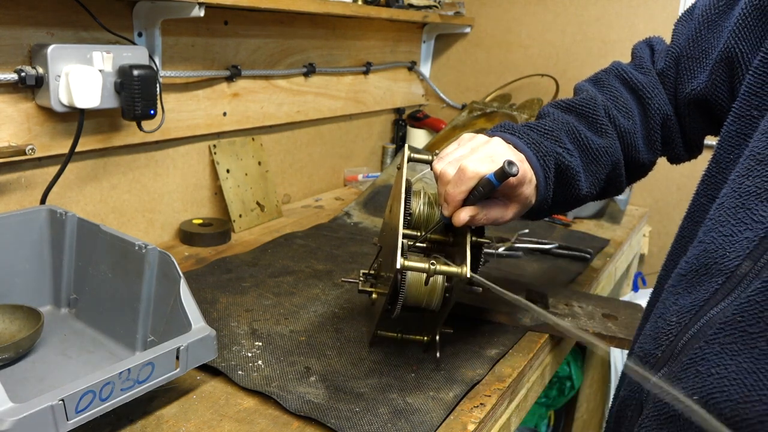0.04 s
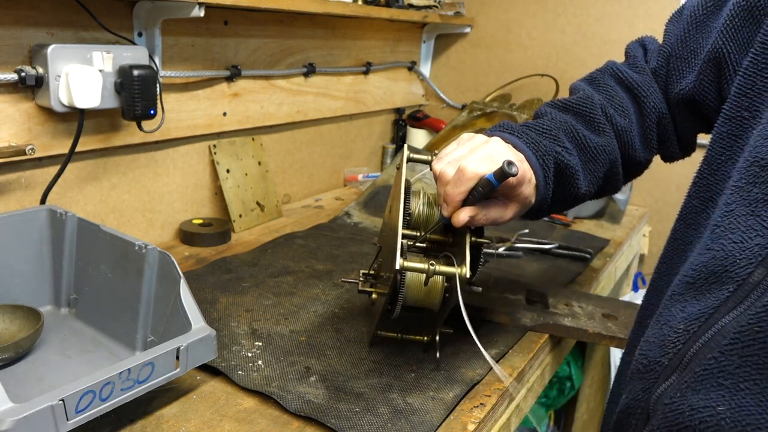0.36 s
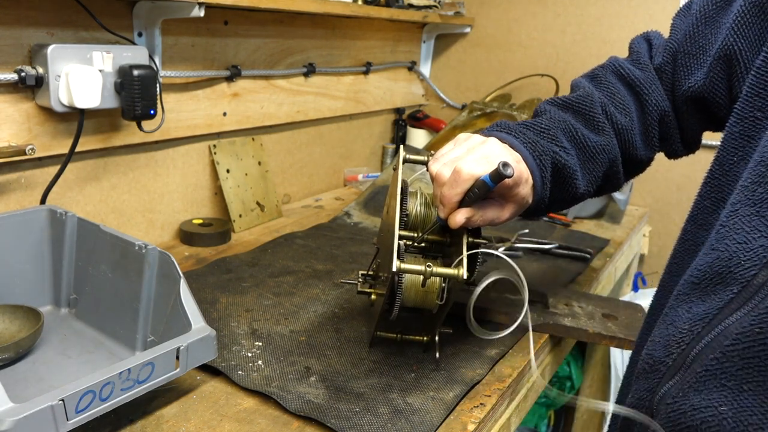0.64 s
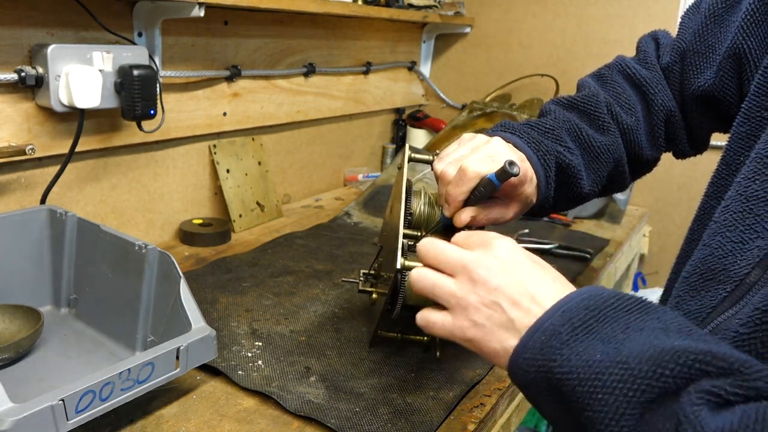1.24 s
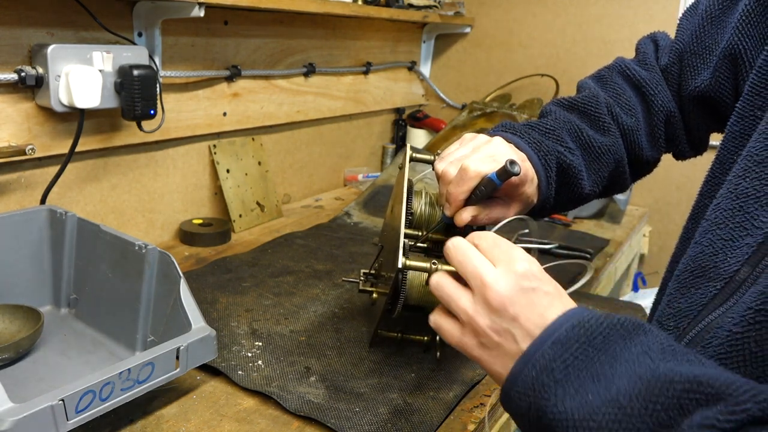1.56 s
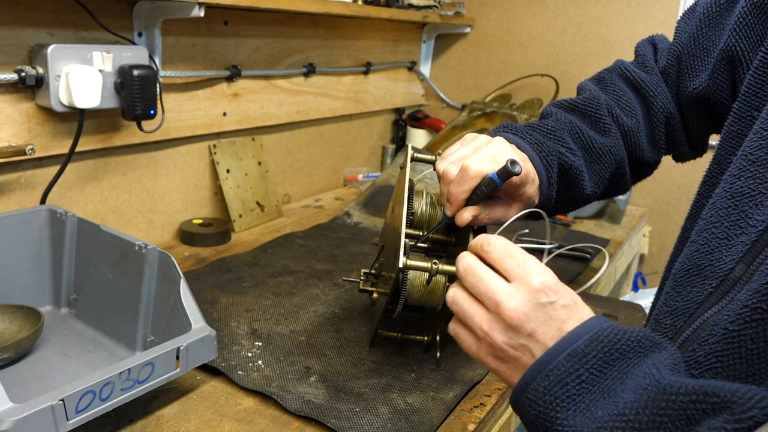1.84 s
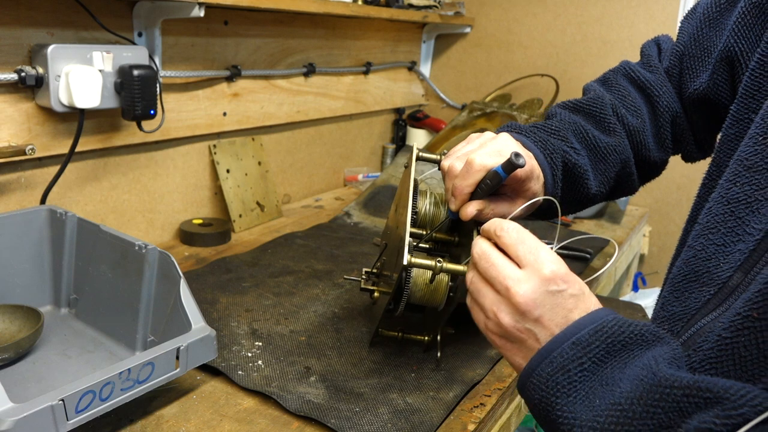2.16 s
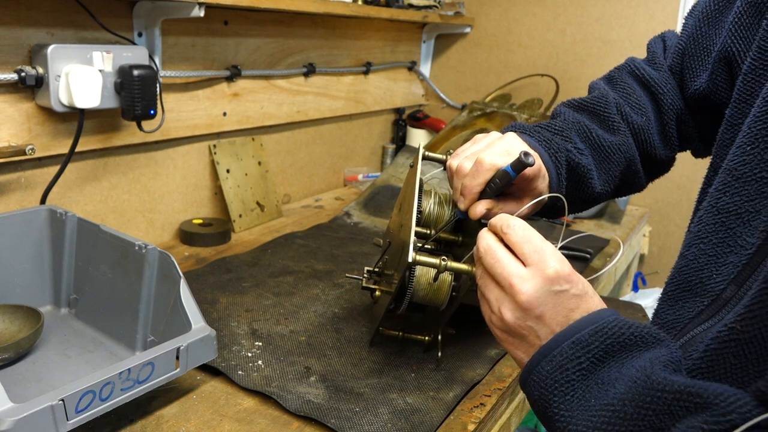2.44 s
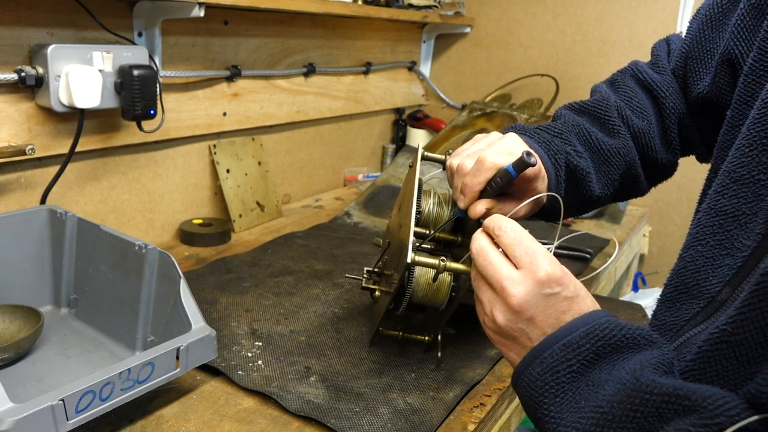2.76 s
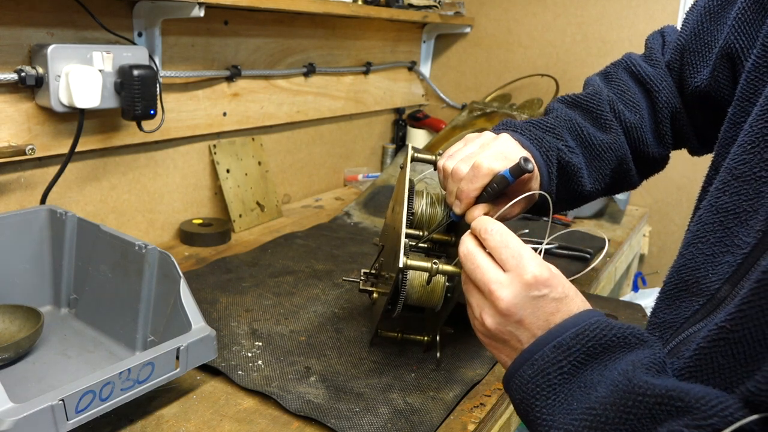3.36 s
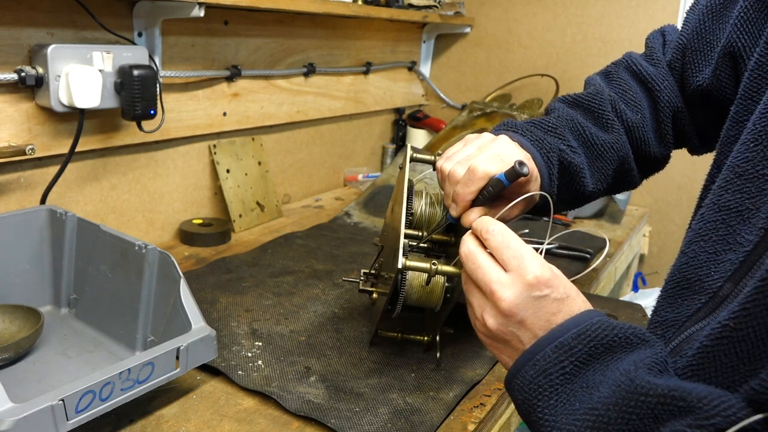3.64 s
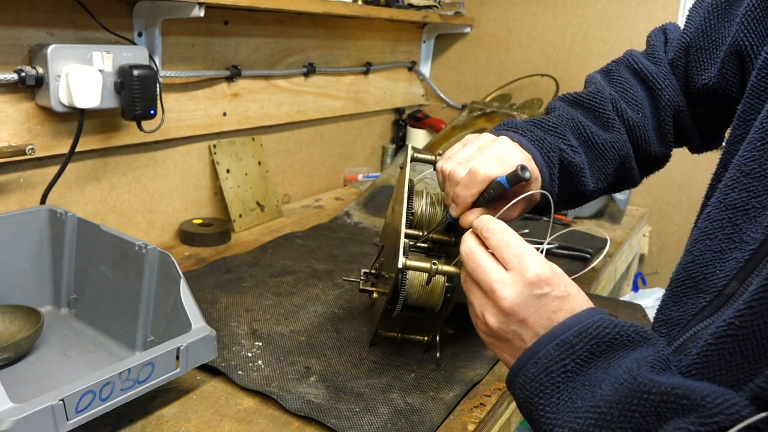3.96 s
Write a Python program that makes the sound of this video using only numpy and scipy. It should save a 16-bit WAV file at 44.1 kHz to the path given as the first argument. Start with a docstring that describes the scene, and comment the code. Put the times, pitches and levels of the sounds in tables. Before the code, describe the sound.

Fast rattling rasp of line pulled from brass clockwork, then sparse clicks and light knocks.

```python
"""First comes a fast rasp and rattle: a line is pulled out of a brass clock movement (the works of a
clock) on a workshop bench, snagging as it runs through the frame and spins the barrel, its drum.
Then hands work at the movement: steel knocks on brass and makes it ring, the frame bumps the bench,
and the line clicks and rubs. Other clocks tick faintly across the small room, over a low rumble."""
import sys
import numpy as np
from scipy import signal
from scipy.fft import rfft, irfft, next_fast_len
from scipy.io import wavfile

SR = 44100
rng = np.random.default_rng(int(sys.argv[2]) if len(sys.argv) > 2 else 0)


def master(y):
    """Save y as 16-bit WAV."""
    cut = np.clip(np.atleast_2d(y).T, -1, 1)
    pcm = np.round(cut * 32767)  # scale
    wavfile.write(sys.argv[1], SR, pcm.astype(np.int16))


N = 176400
T = np.arange(N) / SR
HIT_T = T[:SR // 3]  # time within one hit
TOP_HZ = 11050

# how hard the line is pulled: (time [s], level [dB])
PULL_STRENGTH = [(0, -14.5), (.028, -29), (.092, -25), (.108, -15), (.15, -30), (.245, -14.5), (.48, -17),
                 (.538, -20), (.572, -39), (.625, -32), (.72, -79)]
# the faster the line runs, the brighter it is: (time [s], treble [dB])
PULL_TREBLE = [(0, -2), (.2, -2.5), (.55, 4)]
# tone colour of the running line: (frequency [Hz], level [dB])
LINE_COLOUR = [(150, -21), (780, -17.5), (2400, 0.5), (3700, -3.5), (4400, -6), (5800, 4.5), (7150, 0.5),
               (7800, -2.5), (10900, 0)]
# the frame's modes, the tones it rings at: (frequency [Hz], level [dB], time to fade by 60 dB [s])
FRAME_MODES = [(1262, -1, .009), (2470, 2.5, .012), (3150, 1.5, 0.017), (3550, 1.5, 0.015),
               (4050, 4, 0.047)]
# the line snags: (time [s], level [dB])
SNAGS = [(.035, -16.5), (0.0441, -15.5), (.102, -15), (.127, -16), (0.152, -17), (.180, -15.5),
         (.188, -13.5), (.204, -14), (.234, -14), (.295, -15.5), (3.8474, -15)]
# tone of a snag: (frequency [Hz], level [dB])
SNAG_COLOUR = [(300, -16), (2000, -8.5), (3300, 3.5), (4500, -3), (9000, -10)]
# steel knocks on brass: (time [s], level [dB], treble [dB], ring level [dB], ring fade time [s])
KNOCKS = [(1.5335, -12.5, -0.5, -0.5, 0.14), (1.8, -15.5, 6, 3, 0.15), (2.135, -20, -8, -3.5, .11),
          (2.2761, -25, -21, -2.5, 0.084)]
# tone of a knock: (frequency [Hz], level [dB])
KNOCK_COLOUR = [(150, -8.5), (700, -5.5), (1300, 2.5), (3300, 1.5), (5000, -3.5), (6400, -2), (8000, -15)]
# the frame bumps the bench: (time [s], level [dB], treble [dB], low modes [dB])
BUMPS = [(1.5836, -27.5, -10, 3), (2.3106, -19, 7, 1), (2.8654, -25, -26, -16)]
# tone of a bump: (frequency [Hz], level [dB])
BUMP_COLOUR = [(200, -6.5), (1200, 6.5), (2000, -3.5), (5000, -5.5), (6400, 1), (7600, -6)]
# low modes of frame and bench: (frequency [Hz], level [dB], fade time [s])
BENCH_LOW_MODES = [(520, 5, 0.073), (756, -7.5, 0.061)]
# their higher modes: (frequency [Hz], level [dB], fade time [s])
BENCH_HIGH_MODES = [(1040, -2.5, 0.06), (1177, 1, 0.036), (1254, 4, 0.073)]
# sharp clicks of line and tool: (time [s], level [dB])
CLICKS = [(0.4361, -17), (.453, -17.5), (.478, -14.5), (0.4817, -25), (0.4952, -28), (0.4993, -20),
          (0.52, -22), (0.702, -32.5), (.71, -29.5), (0.7558, -29), (0.858, -23.5), (1.3128, -27),
          (1.5838, -21.5), (2.857, -34.5), (3.373, -27), (3.7446, -29), (3.8367, -25.5), (3.8473, -10),
          (3.8507, -20)]
# tone of a click: (frequency [Hz], level [dB])
CLICK_COLOUR = [(200, -15), (2200, -9.5), (3350, 0), (3900, -5), (4650, 0), (7250, -2), (8200, -7)]
# light taps of the tool: (time [s], level [dB])
TAPS = [(2.394, -41), (3.156, -30), (3.165, -28), (3.292, -32.5)]
# tone of a tap: (frequency [Hz], level [dB])
TAP_COLOUR = [(1500, -4.5), (2500, 6.5), (5500, -17)]
# ring of the steel tool: (frequency [Hz], level [dB], fade time [s])
TOOL_MODES = [(2622, -2.5, 0.038), (4530, 0, 0.087)]
# the line rubs over metal: (time [s], length [s], level [dB])
RUBS = [(0.913, 0.036, -24.5), (1.557, 0.04, -21), (3.857, 0.036, -30.5)]
# tone of rubbing and rustling: (frequency [Hz], level [dB])
RUB_COLOUR = [(150, -11), (1400, -1), (6000, 0.5), (7500, -5.5), (11000, -9.5)]
# fingers rustle on the line: (time [s], level [dB])
FINGER_RUSTLE = [(.69, -67), (.76, -42), (1.4, -45.5), (1.9, -60), (2.8, -61), (3.1, -42), (3.9, -46)]
# rumble of the spinning barrel: (time [s], level [dB])
BARREL_LEVEL = [(0, -30), (.58, -40), (.72, -58)]
# distant ticking clocks: (first tick [s], time between ticks [s], level [dB], treble [dB])
CLOCKS = [(0.193, 1.003, -35, 5.5), (0.381, 1.005, -32.5, 6.5)]
# tone of a tick: (frequency [Hz], level [dB])
TICK_COLOUR = [(400, 0), (1400, 7), (3100, -1.5), (11000, -9)]
# tone of one clock's hissing beat: (frequency [Hz], level [dB])
HISS_COLOUR = [(4300, -19), (5250, -1), (5750, 4.5), (6400, -27.5)]
# steady noise of the room: (frequency [Hz], level [dB])
ROOM_COLOUR = [(65, -12), (330, -21), (650, -27), (3000, -39.5), (8000, -44.5)]
# the low rumble swells and sinks: (time [s], level [dB])
RUMBLE_LEVEL = [(1.3, -40.5), (1.6, -24), (2.05, -33), (2.3, -25.5), (2.7, -39.5), (3.9, -26)]
# tone of that rumble: (frequency [Hz], level [dB])
RUMBLE_COLOUR = [(20, -21.5), (42, 2), (54, -12.5), (80, -25.5), (300, -57.5)]


def running_line(rattles_per_s=2000, spread_db=1.5, rasp_db=-2, ring_db=-3):
    """The pulled line rattles, rasps and snags; it catches and slips, shaking the frame unevenly."""
    sizes = amp(spread_db * np.minimum(rng.exponential(1, N), 4)) * rng.choice([-1, 1], N)
    rattles = unit(sizes * (rng.random(N) < rattles_per_s / SR))
    contact = (rattles + amp(rasp_db) * rng.standard_normal(N)) * flutter()
    shake = np.gradient(contact)
    frame = sum(amp(db) * resonate(shake * flutter(), [(hz, 0, t60)]) for hz, db, t60 in FRAME_MODES)
    rasp = unit(colour(contact, LINE_COLOUR))
    out = unit(rasp + amp(ring_db) * unit(frame)) * curve(PULL_STRENGTH)
    for s, db in SNAGS:
        add(out, s, amp(db) * strike(SNAG_COLOUR, crack_db=5, crack_t60=0.0042, body_t60=0.049))
    return treble(out, np.interp(T, *np.transpose(PULL_TREBLE)))


def brass_knocks(lower_hz=4082, upper_hz=4154, upper_db=-2.5):
    """Steel hits the brass frame, which rings with two tones so close that they wobble."""
    out = np.zeros(N)
    for s, db, treble_db, ring_db, t60 in KNOCKS:
        brass = ring([(lower_hz, 0, t60), (upper_hz, upper_db, t60)]) * flutter()[:len(HIT_T)]
        hit = strike(KNOCK_COLOUR, crack_db=4, crack_t60=0.003, body_t60=0.061)
        add(out, s, amp(db) * (treble(hit, treble_db) + amp(ring_db) * brass))
    return out


def bench_bumps():
    """The frame bumps the bench and both ring briefly."""
    out = np.zeros(N)
    for s, db, treble_db, low_db in BUMPS:
        hit = strike(BUMP_COLOUR, crack_db=10.5, crack_t60=0.0037, body_t60=0.084)
        bench = amp(low_db) * ring(BENCH_LOW_MODES) + ring(BENCH_HIGH_MODES)
        add(out, s, amp(db) * (treble(hit, treble_db) + bench))
    return out


def clicks_and_taps():
    """Line and tool click sharply; light taps make the steel tool ring."""
    out = np.zeros(N)
    for s, db in CLICKS:
        add(out, s, amp(db) * strike(CLICK_COLOUR, crack_db=13, crack_t60=0.0049, body_t60=0.093))
    for s, db in TAPS:
        tap = strike(TAP_COLOUR, crack_db=-2, crack_t60=0.0067, body_t60=0.043)
        add(out, s, amp(db) * (tap + ring(TOOL_MODES)))
    return out


def rubbing(grains_per_s=2500, rise_s=0.0036, fall_s=0.0081, ring_db=-6):
    """Short, gritty slides of the line set the tool ringing; fingers rustle in between."""
    slides = np.zeros(N)
    for s, length, db in RUBS:
        fade_in = np.clip((T - s) / rise_s, 0, 1)
        fade_out = np.exp(-np.maximum(T - s - length, 0) / fall_s)
        slides += amp(db) * fade_in * fade_out
    grains = unit(rng.standard_normal(N) * (rng.random(N) < grains_per_s / SR))
    grit = grains + rng.standard_normal(N)
    scrape = (slides + curve(FINGER_RUSTLE)) * unit(colour(grit, RUB_COLOUR))
    return scrape + slides * amp(ring_db) * resonate(grit, TOOL_MODES)


def barrel(hz=59.6, stop_s=0.547, thump_db=-18, thump_t60=0.19):
    """The spinning barrel rumbles through the bench and thumps as it stops."""
    out = curve(BARREL_LEVEL) * band_noise(hz / 2, hz * 2)
    add(out, stop_s, ring([(hz, thump_db, thump_t60)]))
    return out


def ticking_clocks(rise_s=0.0096, tick_t60=0.24, mode_count=36, mode_t60=0.21, ring_db=1):
    """Distant ticks ring in each clock's case; each rises quickly, holds briefly, then fades."""
    out = np.zeros(N)
    for first, period, db, treble_db in CLOCKS:
        age = (T - first) % period
        ticks = np.minimum(age / rise_s, 1) * dying(np.maximum(age - 2 * rise_s, 0), tick_t60)
        modes = [(hz, 0, mode_t60) for hz in rng.uniform(1000, TOP_HZ, mode_count)]
        ringing = unit(colour(resonate(rng.standard_normal(N), modes), TICK_COLOUR))
        case = unit(amp(ring_db) * ringing + noise(TICK_COLOUR))
        out += amp(db) * ticks * treble(case, treble_db)
    return out


def hissing_clock(period_s=0.534, hiss_db=-34, tock_db=-38.5):
    """A distant clock beats with a soft hiss; a dull tock follows every second beat."""
    hiss = noise(HISS_COLOUR) * flutter() * puffs(period_s, first_s=0.3406)
    tock = band_noise(1040, 2560) * puffs(2 * period_s, first_s=0.397)
    return amp(hiss_db) * hiss + amp(tock_db) * tock


def room_echo(x, t60=0.25, rise_s=0.0014):
    """The walls of the small room throw back many echoes that blur into one short tail."""
    tail = rng.standard_normal(len(HIT_T)) * dying(HIT_T, t60) * np.minimum(HIT_T / rise_s, 1)
    return signal.fftconvolve(x, tail / np.sqrt(np.sum(tail ** 2)))[:N]


def background(steady_db=-36):
    """Steady room noise and a low rumble that swells and sinks."""
    return amp(steady_db) * noise(ROOM_COLOUR) + curve(RUMBLE_LEVEL) * noise(RUMBLE_COLOUR)


def strike(points, crack_db, crack_t60, body_t60):
    """A short crack and the blurred ring of small parts, with the energy of 10 ms at level 1."""
    shape = amp(crack_db) * dying(HIT_T, crack_t60) + dying(HIT_T, body_t60)
    x = colour(shape * rng.standard_normal(len(HIT_T)), points)
    return x / np.sqrt(np.sum(x ** 2) / (SR / 100))


def ring(modes):
    """Struck modes as fading sine waves; neighbours start in opposite directions."""
    return sum((-1) ** k * amp(db) * dying(HIT_T, t60) * np.sin(2 * np.pi * hz * HIT_T)
               for k, (hz, db, t60) in enumerate(modes))


def resonate(x, modes):
    """Modes kept ringing by x, at level 1."""
    return unit(signal.fftconvolve(x, ring(modes))[:N])


def flutter(rate_hz=90, depth_db=3):
    """A quick, uneven flicker of level, like a contact that catches and slips."""
    return amp(depth_db * np.tanh(band_noise(rate_hz / 2, rate_hz * 2)))


def puffs(period_s, first_s, half_width_s=0.039):
    """A soft swell once every period."""
    from_peak = (T - first_s + period_s / 2) % period_s - period_s / 2
    return 1 / (1 + np.abs(from_peak / half_width_s) ** 3)


def noise(points):
    """Steady noise with the given tone colour, at level 1."""
    return unit(colour(rng.standard_normal(N), points))


def band_noise(low_hz, high_hz):
    """Noise between two frequencies, at level 1."""
    band = signal.butter(2, [low_hz, high_hz], "band", fs=SR, output="sos")
    return unit(signal.sosfilt(band, rng.standard_normal(N)))


def colour(x, points):
    """Shape the tone of x along (frequency [Hz], level [dB]) points and trim the very top."""
    size = 2 * next_fast_len(len(x) // 2 + SR // 20)
    hz, db = np.transpose(points)
    log_hz = np.log(np.maximum(np.arange(size // 2 + 1) * SR / size, 1))
    gains = amp(np.interp(log_hz, np.log(hz), db))
    # fold the filter forward in time, so nothing sounds before a hit
    cepstrum = irfft(np.log(gains))
    cepstrum[1:size // 2] *= 2
    cepstrum[size // 2 + 1:] = 0
    x = irfft(rfft(x, size) * np.exp(rfft(cepstrum)))[:len(x)]
    return signal.sosfilt(signal.butter(8, 12000, fs=SR, output="sos"), x)


def treble(x, db, above_hz=4400):
    """Turn the high frequencies up or down."""
    low = signal.sosfilt(signal.butter(1, above_hz, fs=SR, output="sos"), x)
    return low + amp(db) * (x - low)


def amp(db):
    """Turn decibels into a multiplier."""
    return 10 ** (np.asarray(db) / 20)


def unit(x):
    """Scale to an average (rms) level of 1."""
    return x / np.sqrt(np.mean(x ** 2))


def curve(rows):
    """A changing multiplier from (time [s], level [dB]) rows."""
    return amp(np.interp(T, *np.transpose(rows)))


def dying(t, t60):
    """A fade that drops 60 dB every t60 seconds."""
    return np.exp(-np.log(1000) * t / t60)


def add(out, s, x):
    """Mix x into out at s seconds."""
    i = max(int(s * SR), 0)
    out[i:i + len(x)] += x[:max(N - i, 0)]


def scene(echo_db=-6.5, width_db=-28.5):
    """The work close by and the room behind it; left and right are almost the same."""
    near = running_line() + barrel() + brass_knocks() + bench_bumps() + clicks_and_taps() + rubbing()
    mid = near + background() + amp(echo_db) * room_echo(near) + ticking_clocks() + hissing_clock()
    side = amp(width_db) * room_echo(mid)
    return np.array([mid + side, mid - side])


def record(dry):
    """The loudest peaks overload; the deepest bass and the highest treble are cut."""
    bass_cut = signal.butter(2, 24, "high", fs=SR, output="sos")
    top_cut = signal.ellip(10, 0.2, 70, TOP_HZ, fs=SR, output="sos")
    return signal.sosfilt(top_cut, signal.sosfilt(bass_cut, np.clip(dry, -1, 1)))


dry = scene()
out = record(dry)
master(out)
```